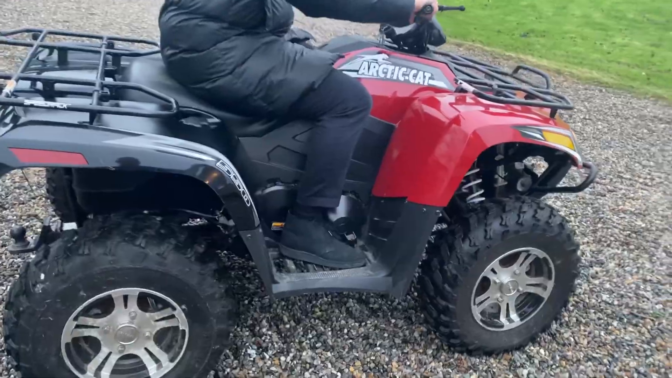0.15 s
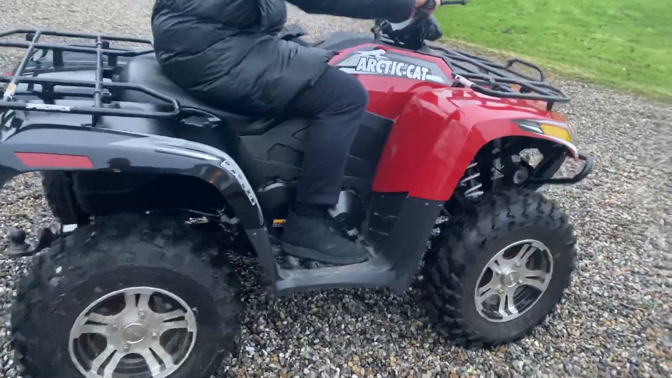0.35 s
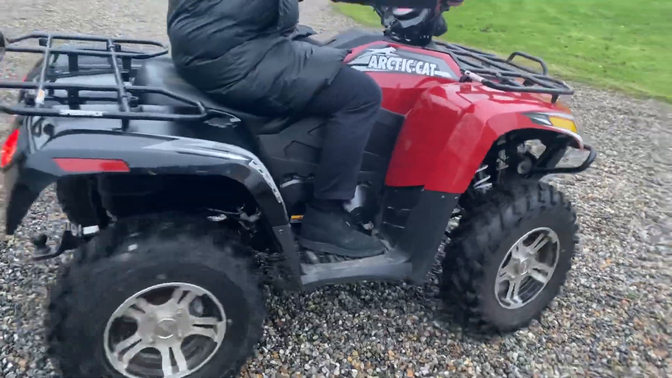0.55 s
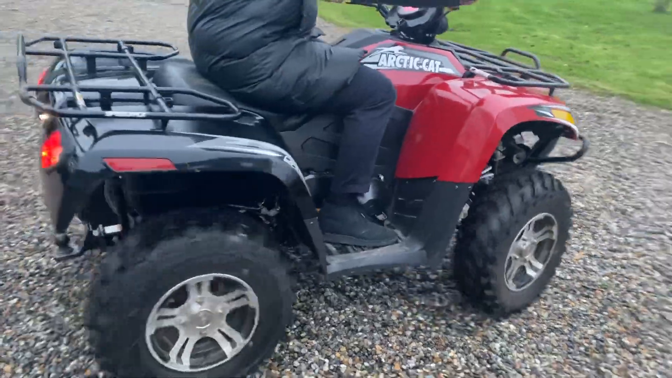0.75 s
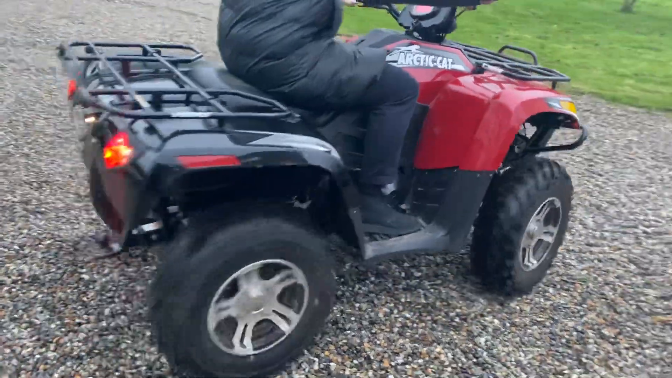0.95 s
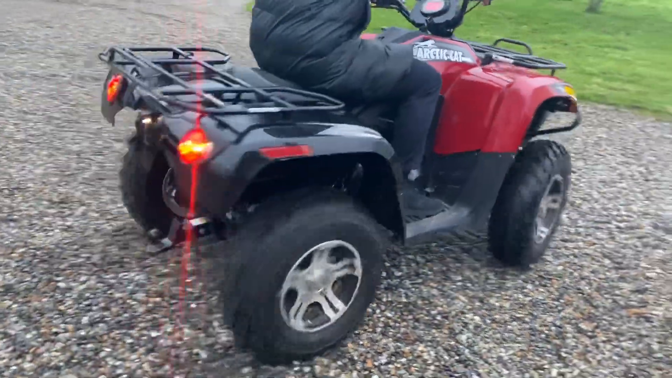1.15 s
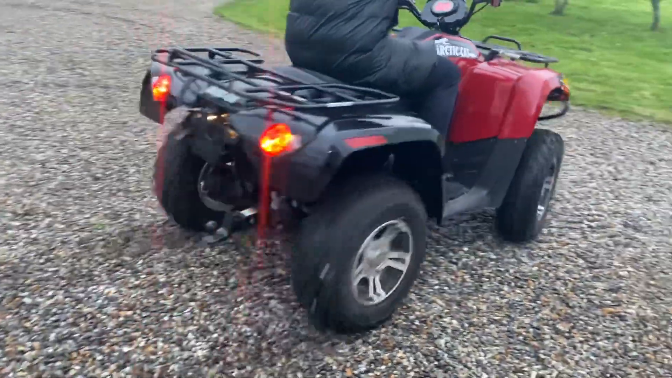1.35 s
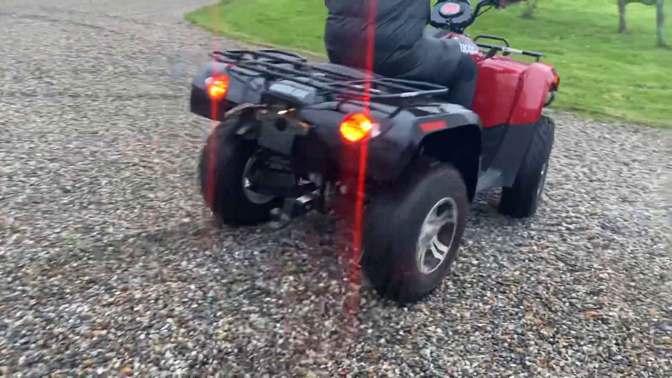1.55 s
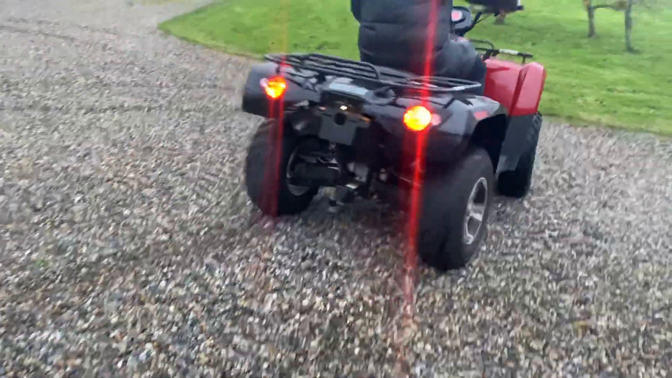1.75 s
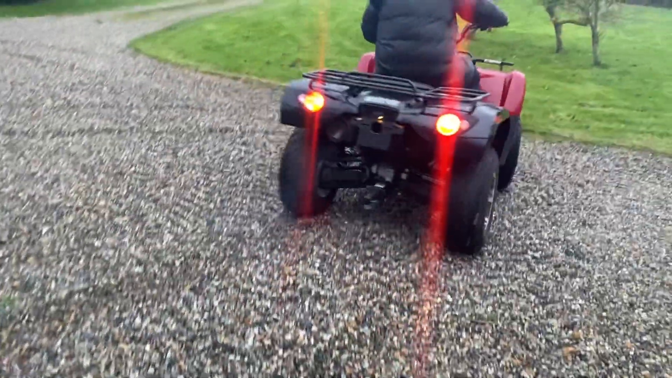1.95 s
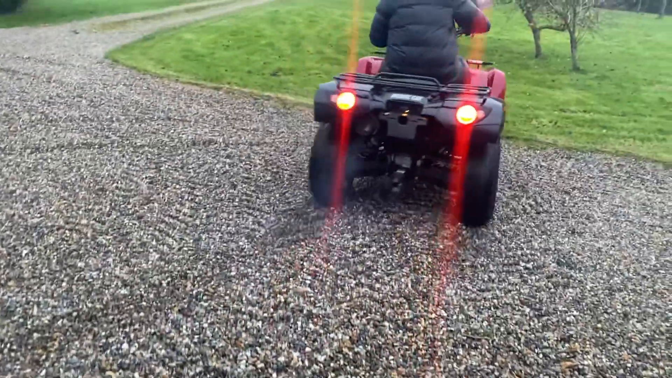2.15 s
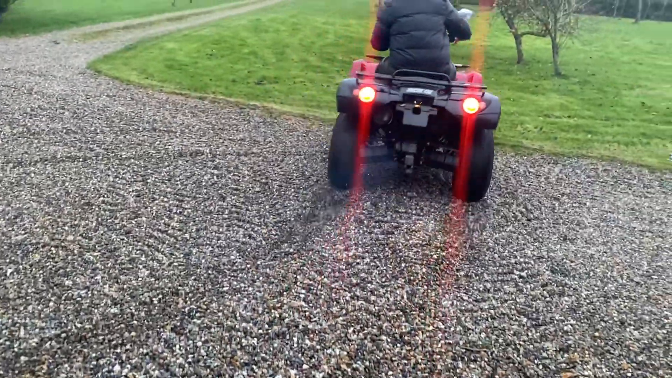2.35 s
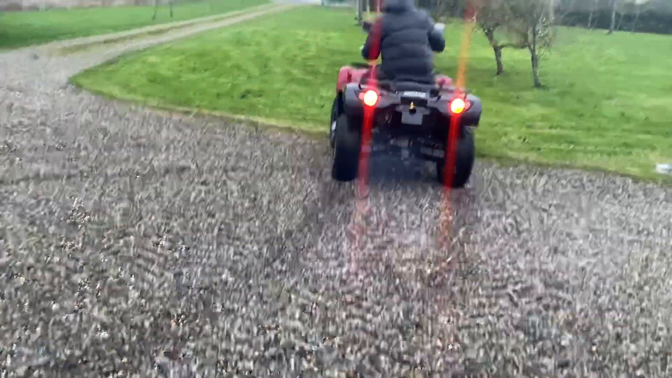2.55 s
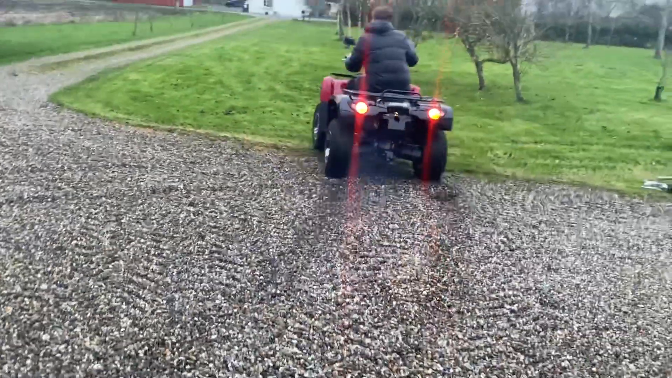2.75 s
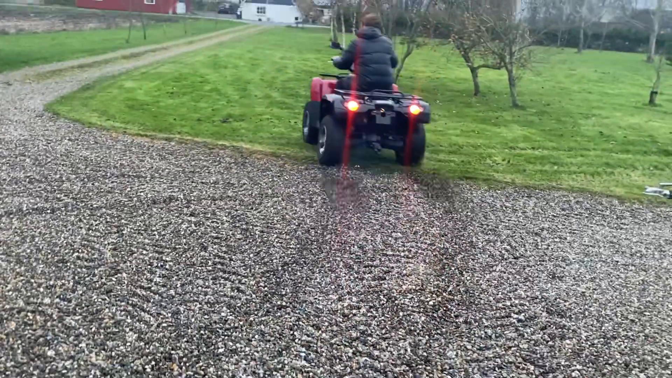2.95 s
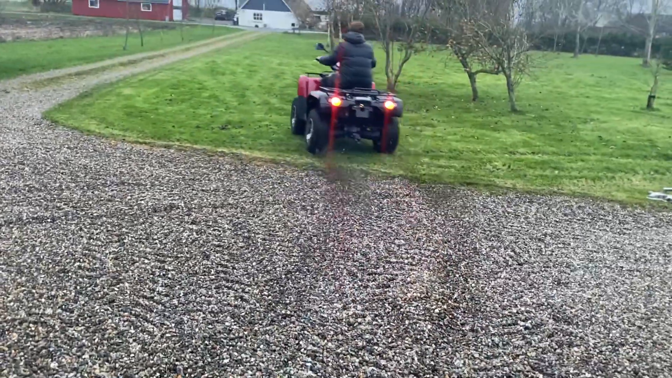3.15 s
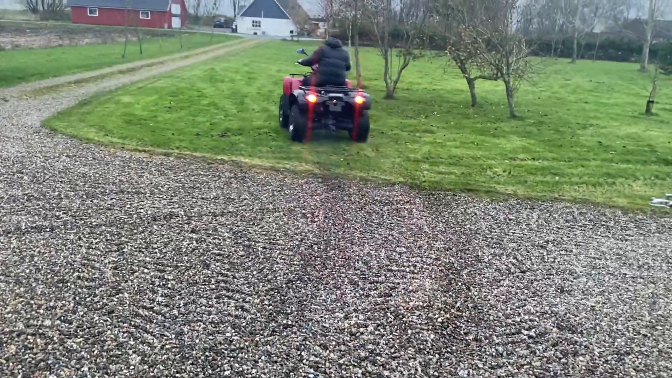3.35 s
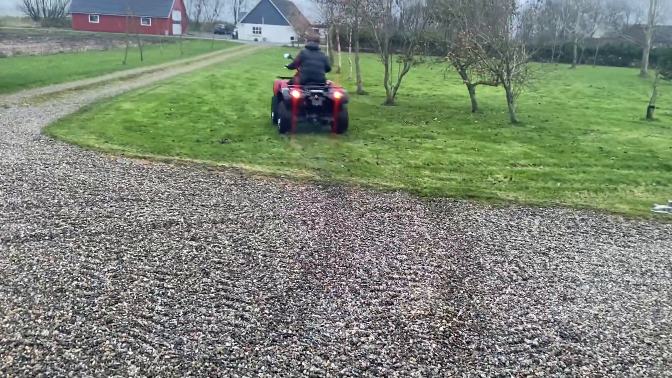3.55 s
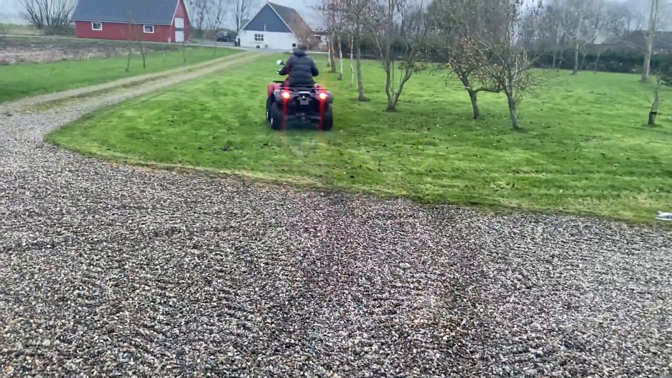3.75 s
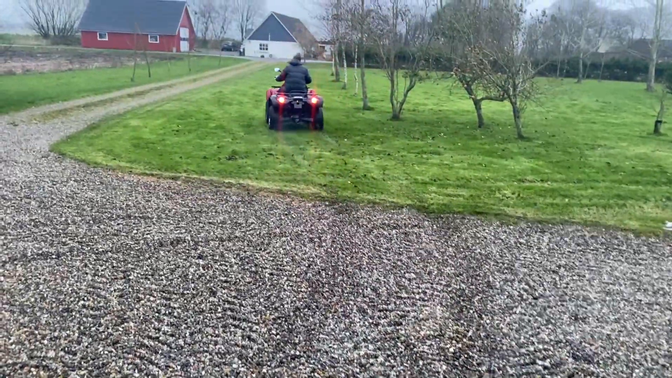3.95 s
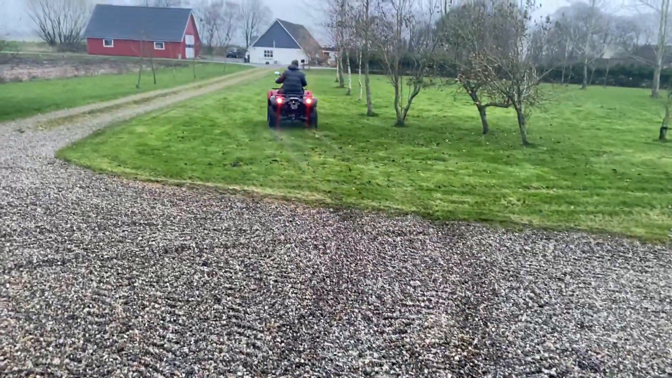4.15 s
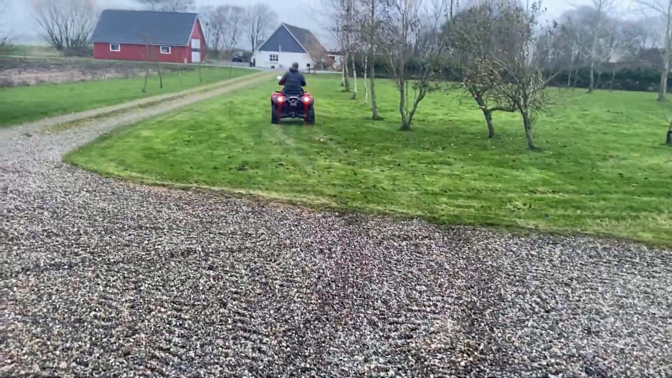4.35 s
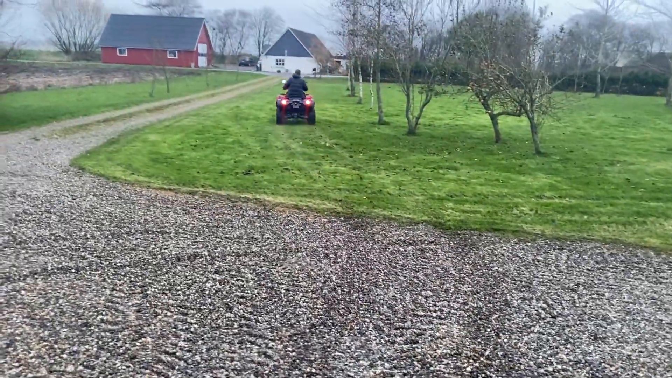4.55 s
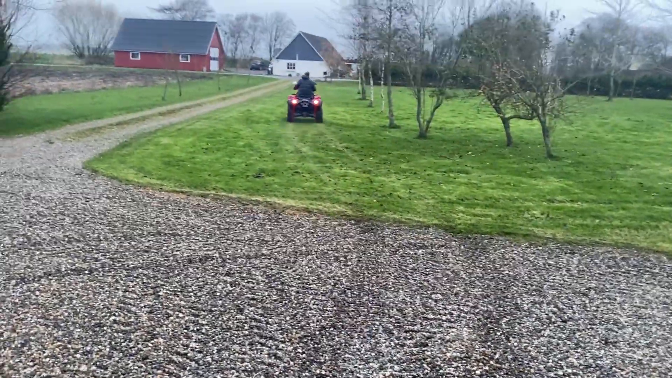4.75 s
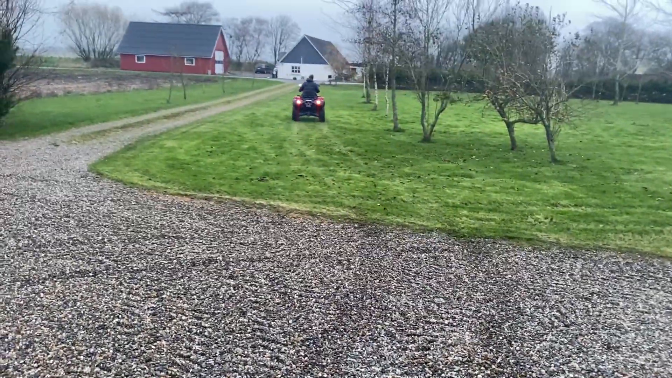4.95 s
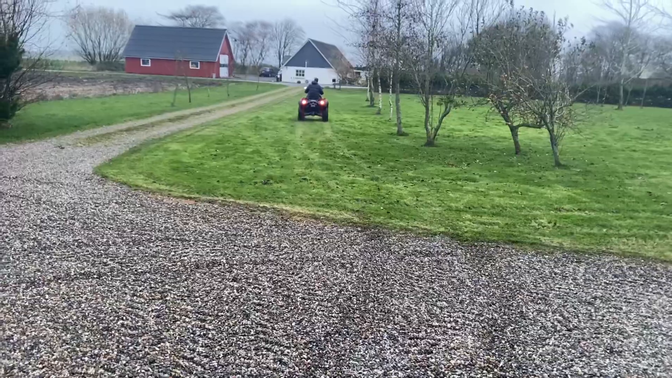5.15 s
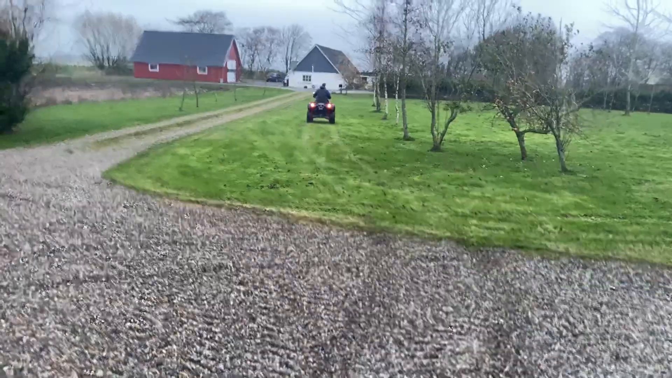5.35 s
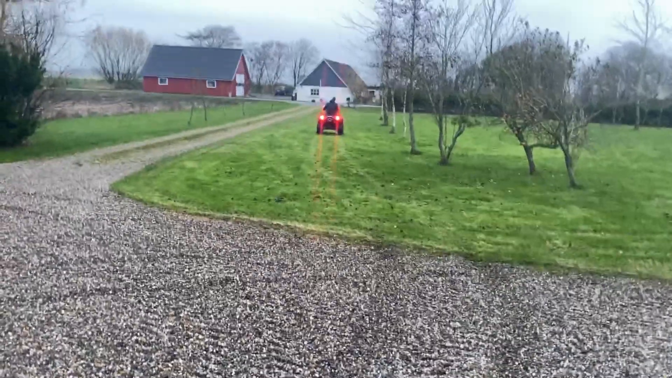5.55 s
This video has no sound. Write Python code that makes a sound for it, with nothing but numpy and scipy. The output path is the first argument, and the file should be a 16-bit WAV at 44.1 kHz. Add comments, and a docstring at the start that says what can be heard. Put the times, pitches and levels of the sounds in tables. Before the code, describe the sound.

Outdoors in a farmyard, close to a handheld stereo microphone, a single-cylinder quad bike catches with quick metallic knocks. It clatters away, tyres grinding and spitting gravel, wind bumping the microphone. The exhaust turns towards us and booms around three seconds, then gravel stops as it reaches grass. Engine clatter fades under wind gusts and low thuds.

```python
"""A single-cylinder four-stroke quad bike fires up with metallic knocks, pulls away over gravel, turns its exhaust
towards the listener and drives off across grass. The exhaust is a stack of crank orders with a booming fifth;
every turn knocks the engine's panels and stirs its valve gear. The early firings are ringing metal modes, the
gravel is grainy noise and the driveline whirrs from behind. Lumpy noise makes the gusts, short tone puffs make
low thuds, many of them likely exhaust chugs, and the bass is centred."""
import sys
import numpy as np
from scipy import signal
from scipy.fft import rfft, irfft, next_fast_len
from scipy.io import wavfile
from scipy.ndimage import uniform_filter1d, map_coordinates

SR = 44100
rng = np.random.default_rng(int(sys.argv[2]) if len(sys.argv) > 2 else 0)


def unload_audio(sound):
    """Save the sound as a 16-bit wav file, at the path given as the first command line argument."""
    columns = np.transpose(np.atleast_2d(sound))
    # keep every value between -1 and 1, then stretch to whole-number steps
    steps = np.round(np.clip(columns, -1, 1) * 32767)
    wavfile.write(sys.argv[1], SR, steps.astype(np.int16))


N = 247401  # length [samples]


def amp(db):
    """Decibels to linear gain."""
    return 10 ** (np.asarray(db) / 20)


def unit(x):
    """x scaled to rms 1."""
    return x / np.sqrt(np.mean(x ** 2) + 1e-20)


def along(points, hz):
    """Read (frequency [Hz], value) points on a log frequency axis."""
    f, v = np.transpose(points)
    return np.interp(np.log(hz + 1), np.log(f + 1), v)


def curves(rows):
    """One automation curve per column after the time."""
    s, *cols = np.transpose(rows)
    return [np.interp(np.arange(N) / SR, s, c) for c in cols]


def wobble(rate):
    """A smooth random curve, rate knots a second."""
    knots = rng.standard_normal(int(N * rate / SR) + 4)
    return map_coordinates(knots, [np.arange(N) * rate / SR])


def filtered(x, response):
    """x times a complex response of frequency."""
    m = next_fast_len(N + SR // 2)
    return irfft(rfft(x, m) * response(np.fft.rfftfreq(m, 1 / SR)), m)[..., :N]


def coloured(x, spectrum):
    """x shaped by (frequency [Hz], level [dB]) points, rms 1."""
    return unit(filtered(x, lambda hz: amp(along(spectrum, hz))))


def ringing(x, modes):
    """x through parallel (frequency [Hz], width [Hz], level [dB]) resonances of alternating sign, rms 1."""
    def response(f):
        return sum((-1) ** k * amp(db) * 1j * f * w / (c * c - f * f + 1j * f * w)
                   for k, (c, w, db) in enumerate(modes))
    return unit(filtered(x, response))


def steep_ringing(x, modes):
    """Resonances run twice, second time three times as wide: steep skirts keep the valleys dark."""
    return ringing(ringing(x, modes), [(c, 3 * w, 0) for c, w, db in modes])


def rough(depth_db, rate):
    """Two noises under one lumpy gain: what both channels share, and what differs."""
    return amp(depth_db * wobble(rate)) * rng.standard_normal((2, N))


def both(x):
    """A sound that both channels share."""
    return np.array([x, np.zeros(N)])


def patchy(x, depth_db):
    """Shifting bands of colour, as a moving source mixes with its ground reflections."""
    z = signal.stft(x, nperseg=512)[2]
    field = rng.standard_normal(z.shape[1:])
    field = uniform_filter1d(field, 3, 0)  # smooth across frequency
    field = uniform_filter1d(field, 30, 1)  # smooth across time
    return unit(signal.istft(z * amp(depth_db * unit(field)), nperseg=512)[1][:, :N])


def swells(rows, rise_s):
    """Sum in dB of (time [s], swell [dB], fall [s]) rows: straight up to the peak, straight down again."""
    t = np.arange(N) / SR
    return sum(db * np.interp(t, [s - abs(rise_s), s, s + abs(fall_s)], [0, 1, 0]) for s, db, fall_s in rows)


def drifting(x, rows):
    """x with its spectrum slid along (time [s], shift [Hz]) points."""
    phase = 2 * np.pi * np.cumsum(curves(rows)[0]) / SR
    return (signal.hilbert(x, next_fast_len(N))[..., :N] * np.exp(1j * phase)).real


# wind bed under the gusts: (time [s], buffet level [dB], flutter level [dB])
WIND_BED = [(0, -39.5, -39), (1.2, -35.5, -39.5), (2.39, -39.5, -40.5), (2.7, -35, -33.5),
            (2.95, -31.5, -28), (3.3, -33, -26), (3.75, -30, -31), (4.05, -33, -35.5), (4.4, -38.5, -42.5),
            (5.3, -39.5, -47.5), (5.6, -37.5, -44)]
# wind rasp between gusts: (time [s], level [dB])
RASP_BED = [(2.9, -60), (3.2, -44), (3.52, -49), (3.6, -34), (3.99, -32.5), (4.025, -34), (4.06, -32),
            (4.15, -36.5), (4.22, -48), (4.26, -38), (4.41, -36), (4.47, -47.5), (5.6, -55)]
# gusts: (time [s], buffet swell [dB], flutter and rasp swell [dB], fall [s])
GUSTS = [(.42, 2, 1, 0.057), (1.39, 11, 17, .07), (1.455, 10, 16, .08), (1.74, 8, 9, 0.064),
         (1.9, 7, 6, 0.35), (3.15, 5, -9, 0.044), (3.35, 7, -4, 0.084), (3.56, 8, 2, 0.086),
         (3.68, 6, 4.5, 0.037), (3.81, 8, 5, 0.024), (3.9, 3, 5.5, .1), (4.08, -2, 3.5, .04),
         (4.145, -3, 4.5, 0.037), (4.28, 3, 6, 0.17), (4.51, 1, 9, 0.034), (4.58, 4, 7, 0.025),
         (4.645, 8, 14, 0.061), (4.85, 5, 9.5, 0.16), (5.03, 3, 7, 0.027), (5.075, 0, 9, 0.04),
         (5.155, -1, 12, .03), (5.307, 5, 14.5, 0.091), (5.43, -3, 12, 0.031), (5.5, 2, 13.5, 0.025),
         (5.56, 8, 17.5, 0.073)]
# wind colours, deep to bright: (frequency [Hz], density [dB per Hz])
BUFFET_COLOUR = [(15, -38), (30, -31), (45, -1.5), (90, -0.5), (180, -6.5), (400, -22.5), (1000, -74)]
FLUTTER_COLOUR = [(100, -19), (200, -3), (350, -2), (700, -10.5), (1500, -27), (4000, -60)]
RASP_COLOUR = [(200, -27), (450, 2), (800, 0.5), (1300, -2.5), (2000, -13.5), (4000, -35)]
GUST_RISE_S, FLUTTER_GROWS = 0.046, 0.82  # swell of the flutter over that of the rasp
RASP_APART_DB = 15  # the rasp differs more from side to side than the engine does


def wind():
    """Lumpy pressure swings on the microphone, a faster flutter and a rasp above them, all lifted by gusts."""
    buffet_db, flutter_db = curves(WIND_BED)
    gusts = np.array(GUSTS)
    gust_db = swells(gusts[:, [0, 1, 3]], GUST_RISE_S)
    upper_db = swells(gusts[:, [0, 2, 3]], GUST_RISE_S)
    buffet = amp(buffet_db + gust_db) * coloured(rough(0.89, 25), BUFFET_COLOUR)
    flutter = amp(flutter_db + FLUTTER_GROWS * upper_db) * coloured(rough(1.84, 70), FLUTTER_COLOUR)
    rasp = amp(curves(RASP_BED)[0] + upper_db) * coloured(rough(2.2, 80), RASP_COLOUR)
    rasp = rasp * amp([[0], [RASP_APART_DB]])
    return buffet + flutter + rasp


# tyres rolling, on grass from 3.1 s, before spurts: (time [s], grit level [dB], crunch level [dB])
ROLLING = [(0, -51.5, -55.5), (.28, -42, -44), (.7, -28, -34), (.81, -28.5, -39), (.95, -23.5, -39),
           (1.4, -21.5, -27.5), (1.64, -27.5, -30), (2.08, -28, -34), (2.18, -27.5, -34),
           (2.53, -26.5, -34), (2.65, -24.5, -27.5), (2.8, -23, -24), (3.07, -30.5, -31), (3.63, -52, -45),
           (4.33, -51.5, -42.5), (5.04, -60.5, -55), (5.1, -68, -63.5), (5.6, -79, -57.5)]
# a tyre spits stones: (time [s], grit swell [dB])
SPURTS = [(.32, 8), (.47, 1), (.765, 7.5), (.87, 11), (.98, 5), (1.06, 3.5), (1.15, 3), (1.23, 5),
          (1.33, 3), (1.68, 0.5), (1.93, 2.5), (2.029, 5.5), (2.12, 6.5), (2.57, 4.5), (2.689, 2.5),
          (2.791, 0.5)]
# colours of the fine grit and the coarser crunch: (frequency [Hz], density [dB per Hz])
GRIT_COLOUR = [(3000, -18), (6000, -12.5), (7000, -6.5), (7700, -9.5), (8100, 3), (11000, 0.5),
               (13000, 0.5), (15500, -4.5)]
CRUNCH_COLOUR = [(300, -23), (1000, 10), (2500, -5), (4000, -4), (5500, -3), (7000, 0.5), (8500, -2),
                 (11000, -12), (16000, -42)]
SPURT_RISE_S, SPURT_FALL_S = 0.04, 0.03
CRUNCH_GROWS = 0.37  # swell of the crunch over that of the grit


def gravel():
    """Stones grind under the tyres: thousands of tiny contacts, each dying in milliseconds, roughen noise."""
    grit_db, crunch_db = curves(ROLLING)
    spurt_db = swells([(s, db, SPURT_FALL_S) for s, db in SPURTS], SPURT_RISE_S)
    sizes = amp(5 * rng.standard_normal(N).clip(-2, 2))
    contacts = (rng.random(N) < 900 / SR) * sizes  # about 900 a second
    decay = np.exp(-np.arange(400) / (0.001 * SR))  # 1 ms time constant
    grains = signal.fftconvolve(contacts, decay)[:N]
    gate = 2.6 + 0.5 * unit(grains - grains.mean())
    grit = patchy(coloured(gate * rough(.6, 25), GRIT_COLOUR), depth_db=1.5)
    crunch = patchy(coloured(gate * rough(.8, 30), CRUNCH_COLOUR), depth_db=1.5)
    return amp(grit_db + spurt_db) * grit + amp(crunch_db + CRUNCH_GROWS * spurt_db) * crunch


def crank_beat(turns):
    """Each crank turn gives a soft swell and a sharp knock; alternate turns, the firing ones, are harder."""
    count = turns.astype(int)
    uneven_db = .8 * rng.standard_normal(count[-1] + 1)[count]
    strength = amp(uneven_db + .6 * (-1) ** count)
    beat = strength * np.sin(np.pi * (turns % 1) ** .6) ** 4
    late = np.floor(turns - .3 + .005 * wobble(40))  # the knock lands about 0.3 turn in
    strikes = np.diff(late, prepend=late[0]) > 0
    knocks = both(strength * strikes * np.sqrt(SR / 45))  # near rms 1 at 45 turns a second
    return beat, knocks


def burst(beat, steady):
    """Noise shaken by the crank, over a steady floor."""
    return (steady + beat) * rough(.3, 40)


# the bike draws out of near earshot: start and end [s]
FAR_S = [2.6, 3.757]


def farness():
    """0 near, 1 once the bike is far."""
    return np.interp(np.arange(N) / SR, FAR_S, [0, 1])


# driveline heard from behind: (time [s], lower whine level [dB], upper whine level [dB])
WHIRR = [(3.9, -52, -52), (4.25, -52, -50), (4.4, -46, -51), (4.6, -47, -58), (4.94, -47, -62),
         (5.05, -62, -70)]
# lower and upper whine: (frequency [Hz], width [Hz], level [dB])
WHIRR_MODES = [(1835, 30, 0), (3010, 50, 0)]


def whirr(beat):
    """Driveline whine: two narrow bands of crank-shaken noise that come in as the bike draws away."""
    whines = [amp(db + wobble(20)) * ringing(burst(beat, 1.5), [mode])
              for db, mode in zip(curves(WHIRR), WHIRR_MODES)]
    return farness() * sum(whines)


# valve gear: (time [s], level [dB])
CLATTER = [(0, -46.5), (.3, -39), (1.52, -35.5), (2.48, -34.5), (2.91, -29), (3.24, -31.5), (3.78, -36),
           (4.95, -47.5), (5.07, -57), (5.6, -49)]
# valve gear up close: (frequency [Hz], width [Hz], level [dB])
CLATTER_MODES = [(1667, 204, 3), (2470, 590, 0), (3120, 730, -1), (4690, 980, -16)]
# valve gear blurred by distance: (frequency [Hz], density [dB per Hz])
DISTANT_COLOUR = [(700, -32), (1500, 3), (1750, 2.5), (2650, -4), (3600, 0), (4100, -6), (4650, -7),
                  (5500, -14.5), (9000, -30)]


def valve_gear(beat):
    """Clatter of crank-shaken noise, crossfading from distinct resonances to one blurred colour with distance."""
    far = farness()
    near_clatter = steep_ringing(burst(beat, 5.6), CLATTER_MODES)
    far_clatter = coloured(burst(beat, 7.8), DISTANT_COLOUR)
    valves = np.sqrt(1 - far) * near_clatter + np.sqrt(far) * far_clatter
    return amp(curves(CLATTER)[0]) * patchy(valves, depth_db=1.8)


# engine case: (time [s], level [dB])
CASE = [(0, -44.5), (.15, -41), (.47, -41), (.87, -31.5), (1.23, -29), (1.36, -30.5), (1.7, -32.5),
        (2.0, -29.5), (2.4, -30), (2.85, -27), (3.1, -31), (3.5, -36), (3.8, -39), (5, -51.5), (5.6, -66.5)]
# silencer shell: (time [s], level over the engine case [dB])
SHELL = [(0, -3), (1.24, -11), (1.72, -1), (2.07, 0), (2.47, -14), (3, -17.5), (3.3, -7), (5.6, 0)]
# belt cover, hidden as the bike turns: (time [s], level over the engine case [dB])
COVER = [(0, -7.5), (.47, 5), (.68, -1), (.75, 5), (1.0, 0), (1.36, 2), (2.22, -9.5), (2.78, -2.5),
         (3.5, -9), (5, -0.5), (5.6, 21)]
# panel resonances before any drift: (frequency [Hz], width [Hz], level [dB])
CASE_MODES = [(780, 56, 0.5), (1233, 100, -9)]
SHELL_MODES = [(920, 70, 0)]
COVER_MODES = [(529.6, 150, 0), (680, 140, -2)]
# case and cover rings shift as the bike turns: (time [s], shift [Hz])
CASE_DRIFT = [(0, 40), (.7, 30), (1.0, 30), (1.15, 60), (1.35, 35.5), (1.55, 45), (1.799, -5), (2.4, -0.5),
              (2.65, 20), (3.2, 10), (5.6, 0)]
COVER_DRIFT = [(0, 25), (.73, 55), (1.1, -30), (1.4, 20), (1.9, 10), (5.6, 10)]


def panels(beat, knocks):
    """Every crank turn knocks the case, silencer shell and belt cover and shakes soft noise into them."""
    case_db, = curves(CASE)
    case = drifting(steep_ringing(burst(beat, 2) + 1.6 * knocks, CASE_MODES), CASE_DRIFT)
    shell = steep_ringing(burst(beat, 1) + 1.5 * knocks, SHELL_MODES)
    cover = drifting(steep_ringing(burst(beat, 2.8) + 0.38 * knocks, COVER_MODES), COVER_DRIFT)
    shell_db, cover_db = case_db + curves(SHELL)[0], case_db + curves(COVER)[0]
    return amp(case_db) * case + amp(shell_db) * shell + amp(cover_db) * cover


# early engine firings, speeding up: (time [s], knock level [dB], lift of the upper modes [dB])
FIRINGS = [(0.071, -32, 15), (0.141, -17.5, 10.5), (0.196, -34, 19.5), (0.246, -33, 18),
           (0.292, -39.5, 23.5), (0.336, -29.5, 11), (0.381, -41, 18), (0.423, -42, 20), (0.466, -40, 19)]
# metallic ring of a firing, nominal: (frequency [Hz], level [dB], time to fall 60 dB [s])
FIRING_MODES = [(587, 5, 0.053), (780, 3.5, 0.066), (1122, 2.5, 0.052), (1810, -4.5, 0.033),
                (2410, -21, 0.036), (3240, -25, 0.04), (4120, -24, 0.038), (4970, -29, 0.036),
                (6800, -24, 0.018)]
RATTLE_DB, BRIGHT_HZ = -22, 1500  # rattle under the upper modes; where those begin
LIGHT_DB = -25  # knocks under this level count as light
DETUNE, SCATTER_DB = .035, 3  # spread of a light knock's modes: pitch (share) and level


def early_firings():
    """Each firing is a metallic knock with ringing modes and a rattle; a light one varies and fades faster."""
    out, t = np.zeros(N), np.arange(SR // 8) / SR
    for s, db, bright_db in FIRINGS:
        light = db < LIGHT_DB
        ring = np.zeros(len(t))
        for hz, level, t60 in FIRING_MODES:
            mode_db = level + bright_db * (hz > BRIGHT_HZ) - 60 * t / t60
            if light:
                mode_db = mode_db + SCATTER_DB * rng.standard_normal() - 20 * t / t60
                hz = hz * (1 + DETUNE * rng.standard_normal())
            ring += amp(mode_db) * np.sin(2 * np.pi * hz * t)
        rattle = np.convolve(rng.standard_normal(len(t)), np.hanning(5), "same")
        if light:  # chatter smears the ring
            chatter = unit(np.convolve(rng.standard_normal(len(t)), np.hanning(120), "same"))
            ring = ring * (.6 + .8 * chatter)
        crack = amp(bright_db + RATTLE_DB - 60 * t / 0.056) * rattle
        onset = 1 - np.exp(-t / 0.00097)
        out[round(s * SR):][:len(t)] += amp(db) * (ring * onset + crack)
    return both(out)


# short puffs and low thuds, 3 ms after the listed time: (time [s], puff level [dB], pitch [Hz])
PUFFS = [(.032, -20.5, 480), (.356, -22.5, 172), (.404, -23, 108), (3.56, -16, 355), (3.629, -11.5, 556),
         (3.77, -19, 138), (3.81, -18, 94.7), (3.872, -22, 90), (3.899, -23, 382.4), (3.903, -25, 80),
         (3.965, -19, 160), (4.072, -26, 110.7), (4.127, -24, 97), (4.243, -24, 139.4), (4.292, -21, 96),
         (4.346, -24, 90), (4.447, -25.5, 159.4), (4.559, -29, 90), (4.817, -26.5, 314.5),
         (5.096, -26, 600), (5.15, -20.5, 609), (5.23, -32, 565), (5.312, -20, 620), (5.316, -25, 90),
         (5.388, -29, 600), (5.4, -28.5, 80), (5.41, -13, 570), (5.497, -25, 604), (5.534, -26, 100.7)]


def puffs():
    """Short puffs and low thuds, many likely exhaust chugs: a tone pulse with a tighter snap an octave up."""
    out, t = np.zeros(N + SR), np.arange(-1200, 1200) / SR
    for s, db, hz in PUFFS:
        puff = np.exp(-(t * hz / 0.92) ** 2) * np.cos(2 * np.pi * hz * t)
        snap = 0.32 * np.exp(-(t * hz / 0.21) ** 2) * np.cos(2 * np.pi * 2.0 * hz * t)
        out[round((s + .003) * SR) - 1200:][:len(t)] += amp(db) * (puff + snap)
    return both(out[:N])


# exhaust orders, the fifth left to the boom: (multiple of crank speed, relative level [dB])
HARMONICS = [(1, -6.5), (2, -4.5), (3, -5.5), (4, -4.5), (5, 0), (6, -4.5), (7, -8), (8, -12), (9, -10)]
# fifth order, booming in the silencer: (time [s], level before its wobble [dB])
BOOM = [(.25, -67), (.45, -42), (.8, -37.5), (.9, -76), (1.75, -62), (2.1, -34), (2.33, -48), (2.51, -36),
        (2.6, -25), (2.75, -27.5), (2.93, -25), (3.0, -20), (3.15, -27), (3.2, -19), (3.35, -20),
        (3.6, -23), (3.66, -46), (4.0, -70)]


def exhaust(turns, level_db):
    """Orders of the crank as slightly unsteady sines; the fifth booms on a level curve of its own."""
    tones = sum(amp(db + 2 * wobble(7)) * np.sin(2 * np.pi * (k * turns + rng.random()))
                for k, db in HARMONICS if k != 5)
    boom_gain = amp(curves(BOOM)[0] + 1.5 * wobble(14))
    throb = 1 + .3 * np.sin(np.pi * turns)  # once per two turns, the four-stroke cycle
    boom = boom_gain * throb * np.sin(2 * np.pi * 5 * turns + .22 * wobble(30))
    return both(amp(level_db) * unit(tones) + boom)


# engine ride: (time [s], crank speed [turns/s], exhaust level without the boom [dB])
SPEED = [(0.0, 34.8, -56), (0.23, 45, -40.5), (0.48, 47.8, -44), (1.01, 48.3, -48), (1.29, 48.4, -38),
         (1.72, 34.4, -41), (1.82, 32.3, -34), (2.1, 43, -38), (2.31, 40.2, -37), (2.5, 43.6, -33),
         (2.7, 47.3, -31), (2.97, 47.2, -29), (3.14, 44.4, -31), (3.62, 44.3, -33), (5.6, 39, -49.5)]
# likeness of left and right for noise equal in both rows: (frequency [Hz], likeness [0 to 1])
ALIKE = [(800, 0.97), (1500, 0.99), (3300, 0.52), (3900, 1), (5400, 0.088), (7000, 0.99), (7900, 0.78),
         (8500, 1)]


def scene():
    """Rows: left and right; each hears the shared sound and the differing part with opposite signs."""
    speed, exhaust_db = curves(SPEED)
    turns = np.cumsum(speed) / SR
    beat, knocks = crank_beat(turns)
    field = wind() + gravel() + whirr(beat) + valve_gear(beat) + panels(beat, knocks)
    field = field + early_firings() + puffs() + exhaust(turns, exhaust_db)

    def spread(hz):
        angle = np.arccos(np.clip(along(ALIKE, hz), -1, 1)) / 2
        return np.sqrt(2) * np.array([np.cos(angle), np.sin(angle)])

    shared, apart = filtered(field, spread)
    return np.array([shared + apart, shared - apart]) / np.sqrt(2)


# stereo phase, left ahead in the middle range, stepping in half turns up the treble:
# (frequency [Hz], left over right [radians])
STEREO_PHASE = [(800, -0.076), (1500, 0.79), (2000, 1.35), (3000, 0.57), (3600, 0.98), (7400, 0.39),
                (8500, -np.pi), (9500, -np.pi), (10450, -2 * np.pi), (11700, -2 * np.pi),
                (12600, -3 * np.pi), (13700, -3 * np.pi), (14600, -4 * np.pi)]
# left against right, used below 7500 Hz: (frequency [Hz], left over right [dB])
TILT = [(1000, -0.5), (2000, 1), (3000, 3.5), (5000, 0.5), (7500, 1.5)]
# the sound is mono below this corner: (time [s], corner [Hz])
MONO_HZ = [(0, 1148), (3.2, 1146), (3.5, 650), (5.6, 610)]
TOP_HZ = 15900  # nothing is kept from here up


def record(dry):
    """Stereo image: phase and level differ between left and right by frequency, bass centred, extreme top cut."""
    hz, radians = np.transpose(STEREO_PHASE)
    half = np.array([[.5], [-.5]])  # each channel takes half of the difference

    def image(f):
        return amp(half * along(TILT, f) * (f < 7500)) * np.exp(1j * half * np.interp(f, hz, radians))

    left, right = filtered(dry, image)
    corner = curves(MONO_HZ)[0]
    low, high = corner.min(), corner.max()

    def side_above(c):
        return filtered(left - right, lambda f: 1 / (1 + (c / (f + 1)) ** 12)) / 2

    wide, narrow = side_above(low), side_above(high)
    side = wide + (narrow - wide) * (corner - low) / (high - low)  # a crossfade moves the corner
    mid = (left + right) / 2
    return filtered(np.array([mid + side, mid - side]), lambda f: f < TOP_HZ)


dry = scene()
out = record(dry)
unload_audio(out)
```